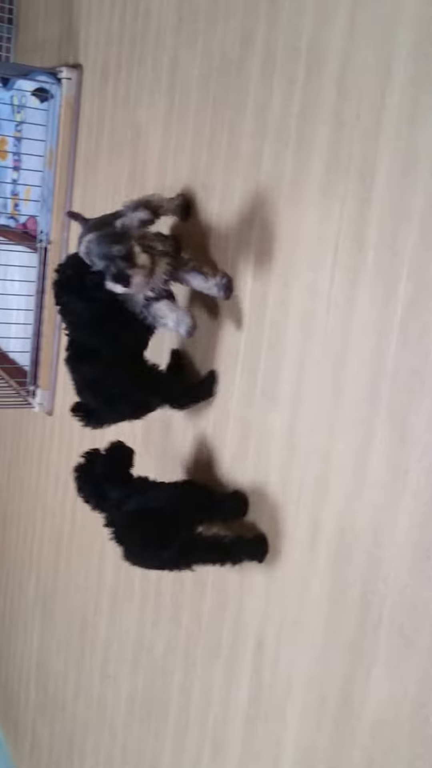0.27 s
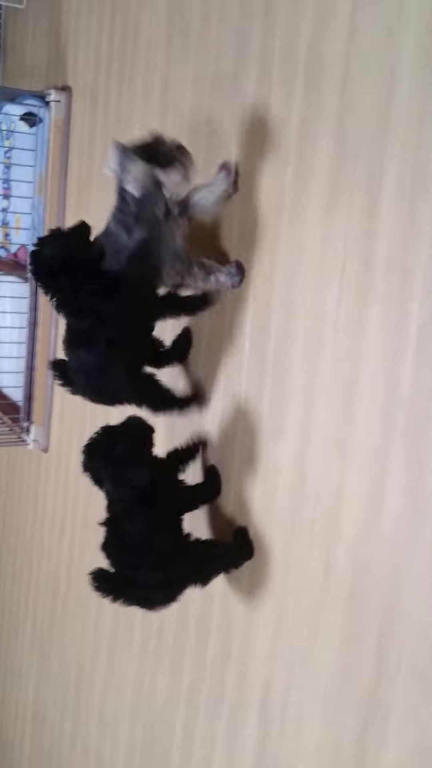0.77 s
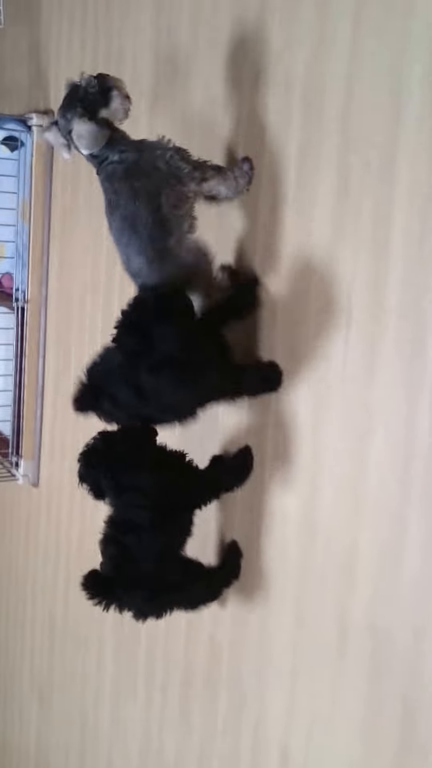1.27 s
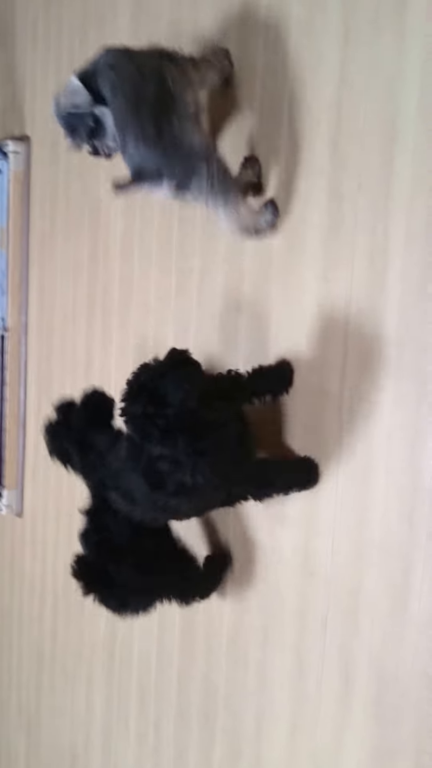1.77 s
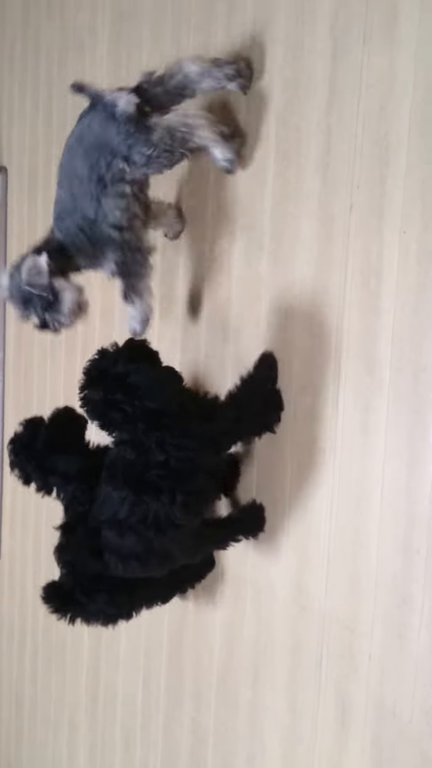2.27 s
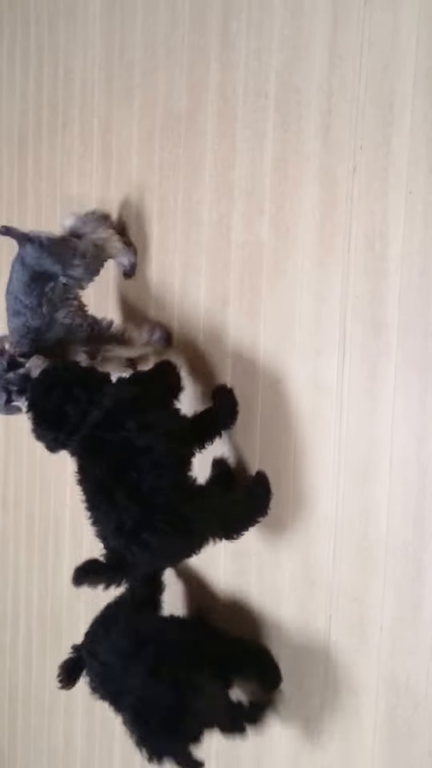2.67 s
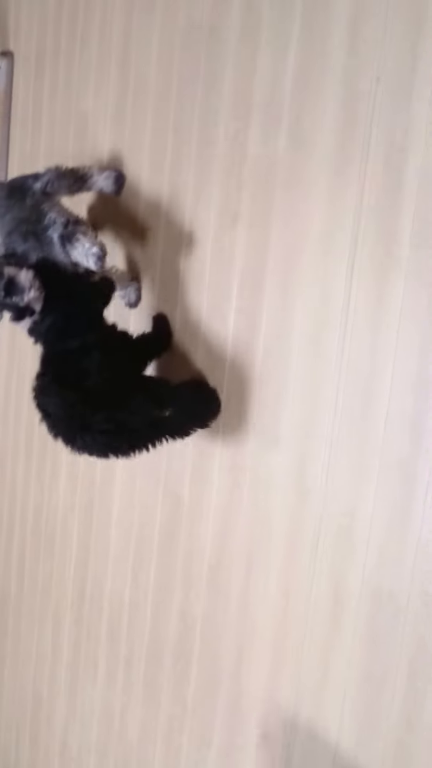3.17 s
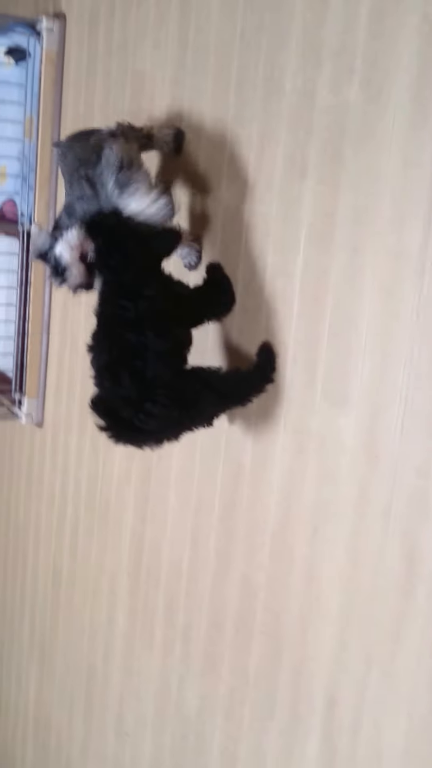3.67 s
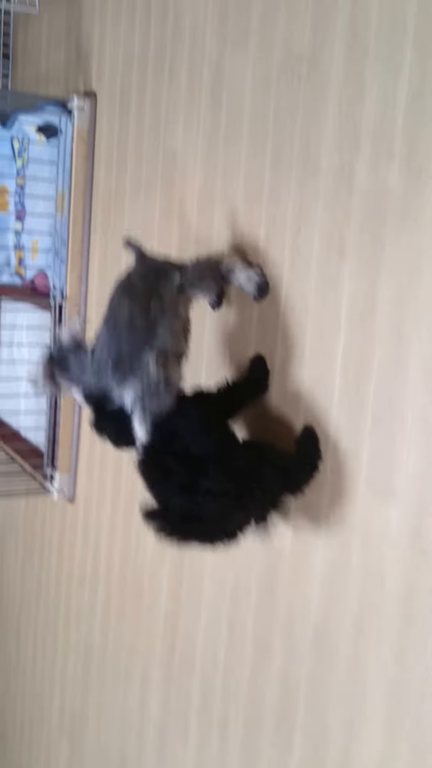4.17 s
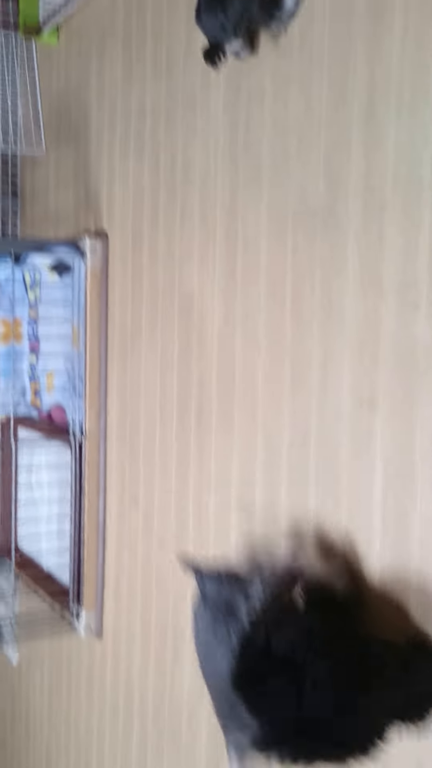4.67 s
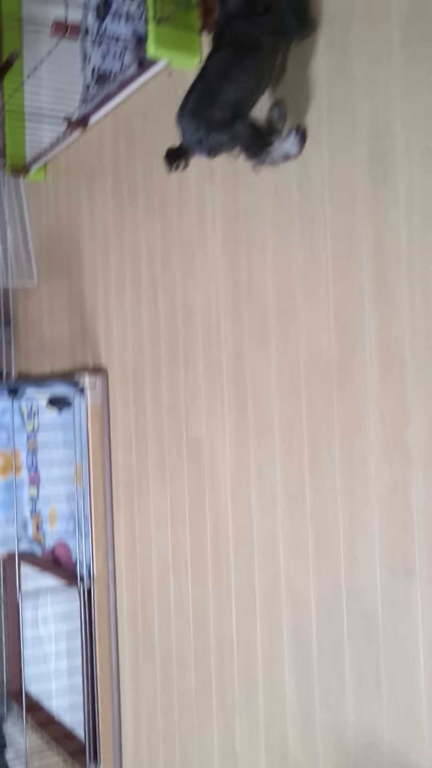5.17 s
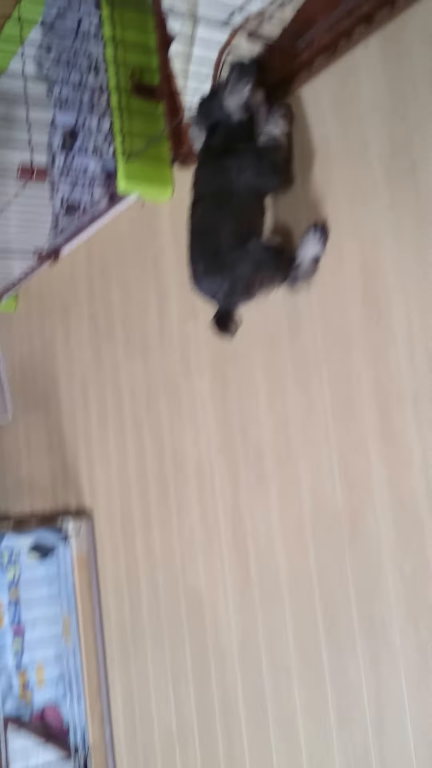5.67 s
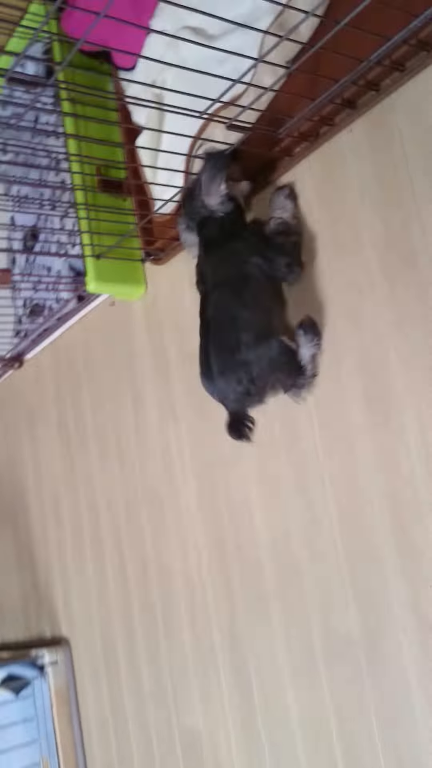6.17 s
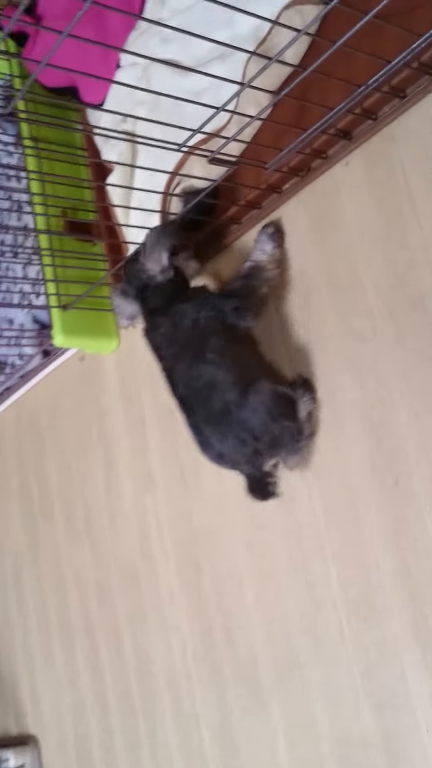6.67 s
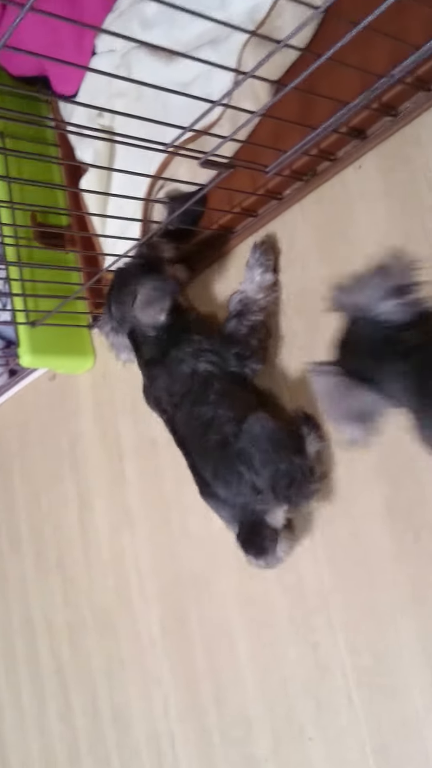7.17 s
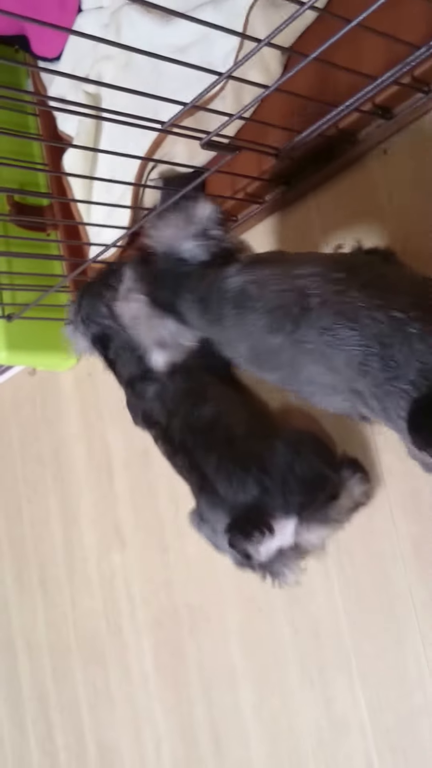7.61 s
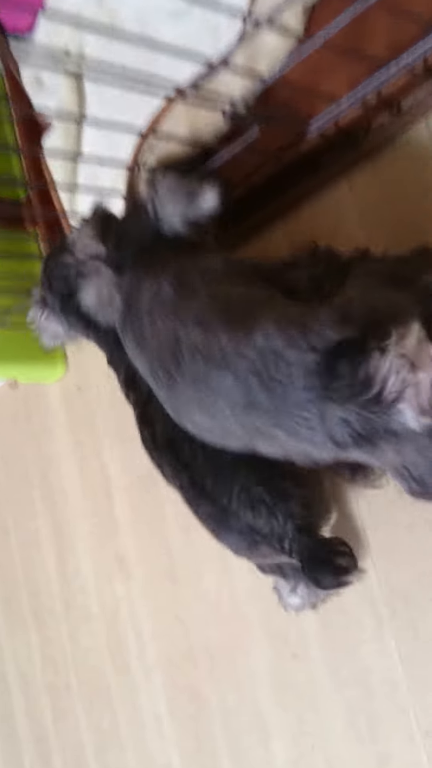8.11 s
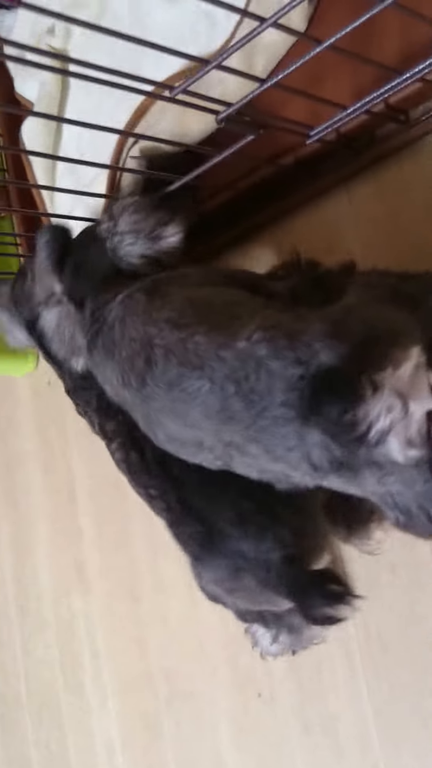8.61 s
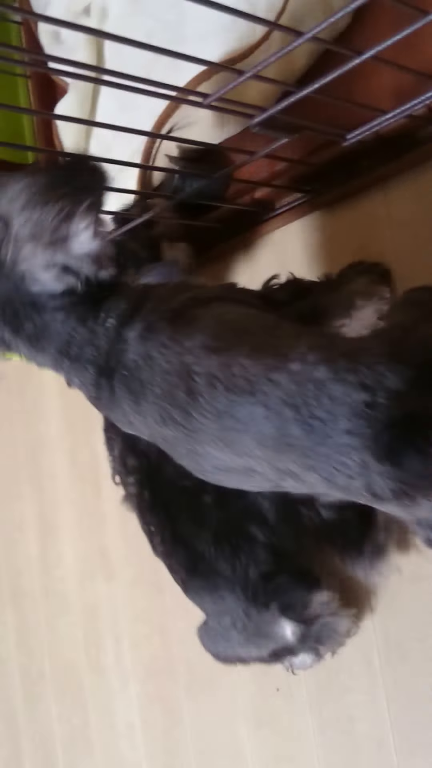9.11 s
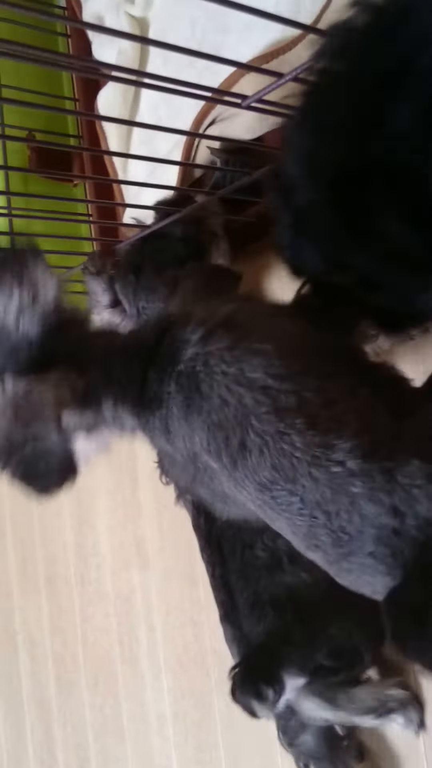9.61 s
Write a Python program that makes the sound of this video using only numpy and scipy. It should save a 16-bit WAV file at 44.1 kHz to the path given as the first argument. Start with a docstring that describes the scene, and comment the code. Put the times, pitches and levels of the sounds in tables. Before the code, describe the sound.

Irregular claw taps and scratchy paw scuffs of playing puppies on floorboards, with an early hollow thump, handling pops and faint cage rings later.

```python
"""A bare, lively room with a wooden floor: small puppies scamper near a hand-held phone.
Paws scrape as swarms of tiny damped slips; rumble and hiss are unsteady noise through resonances.
Claw taps are brief noise blows that ring board, claw and tip; landings boom and pads squeak.
A wire cage rings, a hollow thump hums, and fingers pop and click on the phone at the start.
The phone's two microphones differ in colour, in polarity and by a short path."""
import sys
import numpy as np
from scipy import signal
from scipy.fft import rfft, irfft, next_fast_len
from scipy.io import wavfile
from scipy.ndimage import map_coordinates

SR = 44100
rng = np.random.default_rng(int(sys.argv[2]) if len(sys.argv) > 2 else 0)


def to_linear_factor(level_db):
    """Convert decibel levels (scalar or array-like) to linear amplitude factors."""
    exponent = np.asarray(level_db, float) / 20
    return 10 ** exponent


def wav_out(sig):
    """Save sig, one row per channel (or a flat mono array), as 16-bit PCM at SR to the path in sys.argv[1]."""
    wavfile.write(sys.argv[1], SR, np.round(np.clip(np.atleast_2d(sig).T, -1, 1) * 32767).astype(np.int16))


N = 434385

# resonances of the floor boards: f/Hz, width/Hz, level/dB
FLOOR_BOARDS = [(461, 130, -7), (787, 346, 0), (984, 185, 3.5), (1493, 880, -5)]
# colour of claw tips and hissing pads: f/Hz, level/dB
TIP_COLOUR = [(2500, -17.5), (4800, -10), (7000, 0.5), (11000, 1), (16000, -6)]


def unit(x):
    """Scaled to rms 1."""
    return x / np.sqrt(np.mean(x ** 2) + 1e-20)


def along(points, hz):
    """Reads a curve of (f/Hz, value) points on a log frequency axis."""
    f, v = np.transpose(points)
    return np.interp(np.log(hz + 1), np.log(f + 1), v)


def envelope(points):
    """Gain over the whole scene from (t/s, level/dB) points, joined straight in dB."""
    return to_linear_factor(np.interp(np.arange(N) / SR, *np.transpose(points)))


def filtered(x, response):
    """Multiplies the spectrum of x by a complex response of frequency."""
    n = x.shape[-1]
    m = 2 * next_fast_len(n // 2 + 4096)  # room for the ringing to die away
    spectrum = rfft(x, m) * response(np.fft.rfftfreq(m, 1 / SR))
    return irfft(spectrum, m)[..., :n]


def highpass(x, corner_hz):
    """Steep bass cut without phase shift, 6 dB down at the corner."""
    return filtered(x, lambda hz: 1 / (1 + (corner_hz / (hz + 1)) ** 4))


def causal(points):
    """Minimum-phase response of (f/Hz, level/dB) points: the colour never sounds ahead of its cause."""
    def response(hz):
        cepstrum = irfft(np.log(to_linear_factor(along(points, hz))))
        cepstrum[1:len(hz) - 1] *= 2
        cepstrum[len(hz):] = 0
        return np.exp(rfft(cepstrum))
    return response


def modes(table):
    """Causal response of (f/Hz, width/Hz, level/dB) resonances, passed twice for steep skirts."""
    def response(hz):
        total = 0
        for k, (centre, width, db) in enumerate(table):
            damping = 1j * hz * width
            resonance = damping / (centre * centre - hz * hz + damping)
            total = total + (-1) ** k * to_linear_factor(db) * resonance  # neighbours alternate in sign
        return np.square(total)
    return response


def grains(pitch_hz, count, cycles, spread, uneven_db):
    """Tiny slips at chance moments: damped sines of scattered pitch and size, rms 1 in all."""
    when = rng.integers(0, N, count)
    scatter, size = rng.standard_normal(count), rng.exponential(size=count)
    k = np.arange(128)
    grain_hz = pitch_hz[when] * np.exp(spread * scatter)
    turns = grain_hz[:, None] * k / SR
    wave = to_linear_factor(uneven_db * size)[:, None] * np.sin(2 * np.pi * turns) * np.exp(-turns / cycles)
    places = when[:, None] + k
    return unit(np.bincount(places.ravel(), wave.ravel(), N + len(k))[:N])


def stutter(rate, depth_db):
    """Noise of rms 1 whose strength wavers at random, as a rubbing surface grips and lets go."""
    knots = rng.standard_normal(int(N * rate / SR) + 4)
    grip = map_coordinates(knots, [np.arange(N) * rate / SR])
    return unit(to_linear_factor(depth_db * grip) * rng.standard_normal(N))


def ringing(level, hz, width, rate, depth_db):
    """Uneven rubbing heard through one narrow resonance."""
    return level * unit(filtered(stutter(rate, depth_db), modes([(hz, width, 0)])))


def swells(peak_s, rise_db_s, fall_db_s, t):
    """Power of events that swell and fade straight in dB, one row each."""
    late = t - np.reshape(peak_s, (-1, 1))
    rise = late * np.reshape(rise_db_s, (-1, 1))
    fall = -late * np.reshape(fall_db_s, (-1, 1))
    return to_linear_factor(2 * np.minimum(rise, fall))


def pair(two):
    """Two unrelated signals made alike in the bass, as diffuse sound is at close microphones."""
    # diffuse sound: f/Hz, left-right likeness (0 to 1)
    likeness = [(100, 0.73), (700, 0.86), (2500, 0.065), (6000, 0.034), (15000, .05)]

    def mid_side(hz):
        angle = np.arccos(np.clip(along(likeness, hz), 0, 1)) / 2
        return np.array([np.cos(angle), np.sin(angle)])

    mid, side = filtered(two, mid_side)
    return np.array([mid + side, mid - side])


def effort(at):
    """Scrape pitch and gains of scrape, rumble and hiss at given times: scuffs over light shuffling."""
    # paw scuffs: t/s of the peak, swell/s, scrape f/Hz, then scrape, board rumble and pad hiss level/dB
    scuffs = [(0.056, 0.011, 2400, -44.5, -42, -29.5), (0.12, 0.036, 2320, -46, -55, -43.5),
              (0.306, 0.21, 2430.0, -62.5, -68, -51.5), (0.65, 0.12, 3420, -54.5, -56, -59),
              (0.74, 0.09, 2900.0, -66, -56, -43), (0.809, 0.15, 2900, -46.5, -64, -36),
              (0.989, 0.015, 3060.0, -35.5, -50, -30.5), (1.02, 0.026, 2000, -43, -59, -43),
              (1.05, 0.077, 2120, -44, -43.5, -43), (1.148, 0.12, 2770.0, -45, -43, -39.5),
              (1.378, 0.02, 2750.0, -43, -51, -34.0), (1.482, 0.063, 2750, -39.5, -36.5, -39.5),
              (1.56, 0.24, 2780.0, -59, -54, -40), (1.79, 0.076, 2920, -68, -67, -46),
              (1.921, 0.044, 2280, -52, -45, -60), (1.998, 0.016, 2340, -33, -32.5, -32.5),
              (2.15, 0.1, 2700, -39, -47.5, -38), (2.389, 0.076, 3170, -41.5, -45, -40.5),
              (2.64, 0.1, 2840, -53.5, -50.0, -61), (2.7, 0.044, 3700, -50, -74, -39.0),
              (2.8, 0.15, 3320, -47, -51.5, -44), (2.948, 0.091, 2740.0, -42, -49.5, -39.5),
              (3.06, 0.016, 2600, -39.5, -54, -41), (3.11, 0.073, 3430, -39.5, -52, -38.5),
              (3.38, 0.06, 3330, -58, -76, -50.5), (3.518, 0.063, 3110, -42, -42, -39),
              (3.862, 0.12, 2460, -45.5, -50, -44.0), (3.938, 0.1, 3200.0, -44, -40.5, -44),
              (4.05, 0.3, 3400, -53.5, -76, -49.5), (4.22, 0.093, 3100, -54.5, -72, -48),
              (4.4, 0.028, 2900, -54.5, -74, -49.5), (4.501, 0.073, 3520, -47.5, -70.5, -43),
              (4.73, 0.12, 3200, -48.5, -48.5, -43), (4.81, 0.062, 3440.0, -43.5, -46.5, -41.5),
              (5.02, 0.033, 2700, -50, -52.5, -46.5), (5.2, 0.15, 3120, -50, -57.5, -50),
              (5.33, 0.079, 2640.0, -72, -53, -69), (5.412, 0.096, 2700, -45.5, -60, -42),
              (5.6, 0.12, 2820, -55.5, -53, -57), (5.72, 0.1, 3570, -53.5, -54.5, -48),
              (5.822, 0.082, 2750, -37.5, -40.5, -33), (5.95, 0.16, 2600.0, -51.5, -69.5, -43.5),
              (6.0, 0.06, 2530, -51, -74, -48), (6.21, 0.13, 2720, -49.5, -65.0, -42.5),
              (6.41, 0.087, 3060, -55, -77, -55), (6.56, 0.11, 3320, -49.5, -94, -48.5),
              (6.65, 0.1, 3050, -51, -77, -47.5), (6.689, 0.06, 2090, -43.5, -67.0, -45),
              (6.74, 0.08, 2000, -52.5, -63, -47), (6.85, 0.13, 3490, -48, -69, -47.5),
              (6.91, 0.027, 3700, -56, -65, -50), (7.42, 0.093, 2840, -46.5, -77, -39.5),
              (7.56, 0.12, 2480, -52.5, -71, -49), (7.751, 0.017, 2750.0, -47, -48.5, -44),
              (7.858, 0.021, 2690, -47, -61.0, -44.5), (7.99, 0.036, 2460.0, -57, -51, -33),
              (8.07, 0.3, 2600, -52.5, -58.5, -47), (8.198, 0.08, 2400, -70, -60, -52),
              (8.501, 0.063, 2340, -46, -44.5, -38.5), (8.662, 0.045, 2380.0, -47, -44.5, -32.5),
              (8.78, 0.25, 2280, -51.5, -53, -48.0), (8.89, 0.056, 2980.0, -43, -43, -38),
              (8.97, 0.098, 3400.0, -59, -58.0, -60), (9.06, 0.19, 2500, -64, -59.5, -52),
              (9.2, 0.025, 2800, -66, -78, -45), (9.27, 0.08, 2900, -60, -60, -57),
              (9.411, 0.076, 2900, -49, -59.5, -38.5), (9.52, 0.059, 2600, -53, -66, -44.5),
              (9.67, 0.054, 3500, -67, -69, -69), (9.845, 0.018, 2700.0, -68, -67.5, -43)]
    # light shuffling between the scuffs: t/s, scrape level/dB
    shuffle = [(0, -63.5), (.5, -60), (.7, -57.5), (1.3, -63.5), (1.7, -56.5), (2.3, -60.5), (3.3, -64),
               (3.65, -68), (4.3, -67), (5.2, -59), (6.1, -56.5), (6.5, -66), (7.1, -63), (7.35, -72),
               (7.6, -61.5), (8.35, -62), (9.1, -61), (9.85, -59)]
    shuffle_hz = 2750
    over_scrape_db = np.array([[0], [-7.5], [2.5]])  # shuffled scrape, rumble, hiss
    swell_db = 20.5  # a scuff swells by this much, and falls as much in fade_s
    t = np.arange(0, N / SR + .002, .001)
    s, swell_s, hz, *db = np.transpose(scuffs)
    swell_s = np.maximum(swell_s, .003)
    fade_s = .047 + .45 * swell_s  # slow scuffs also fade slowly
    shape = swells(s, swell_db / swell_s, swell_db / fade_s, t)
    calm = to_linear_factor(2 * (np.interp(t, *np.transpose(shuffle)) + over_scrape_db))
    power = to_linear_factor(2 * np.array(db)) @ shape + calm
    # the stronger scrape draws the pitch to itself
    pitch = ((hz * to_linear_factor(2 * db[0])) @ shape + shuffle_hz * calm[0]) / power[0]
    return [np.interp(at, t, curve) for curve in [pitch, *np.sqrt(power)]]


def paws():
    """Sliding paws scrape with the claws, drum the boards and hiss with the pads."""
    hz, scrape_gain, boards_gain, hiss_gain = effort(np.arange(N) / SR)
    scrape = grains(hz, count=14000, cycles=3.2, spread=.14, uneven_db=2.8)
    scrape = highpass(scrape, 700)  # small claws push no bass
    boards = unit(filtered(stutter(90, depth_db=2.5), modes(FLOOR_BOARDS)))
    hiss = unit(filtered(stutter(150, depth_db=3), causal(TIP_COLOUR)))
    return scrape_gain * scrape + boards_gain * boards + hiss_gain * hiss


def patter(count):
    """Small taps at chance moments, as strong as the paws are busy."""
    over_paws_db = [8.5, 8, 22]  # knock over rumble, ring over scrape, tick over hiss
    spread_db, side_spread_db = 4.5, 4
    s, chance = rng.uniform(0, N / SR, count), rng.standard_normal((count, 4))
    _, scrape, boards, hiss = effort(s)
    db = 20 * np.log10([boards, scrape, hiss]).T + over_paws_db + spread_db * chance[:, :3]
    return np.column_stack([s, db, side_spread_db * chance[:, 3]])


def taps():
    """Each tap is a brief blow that rings board, claw and tip; it lands nearer one microphone."""
    # loud claw taps: t/s, board knock, claw ring and bright tick level/dB, lean to the left level/dB
    loud_taps = [(0.055, -43, -20, -26, 2), (0.6422, -60, -48, -24, 2), (0.6557, -50, -52, -19.5, 3.5),
                 (0.6981, -36.5, -49, -16, 3), (0.732, -63, -52, -19.5, 12), (0.755, -48, -47, -32, 2.0),
                 (0.7964, -33, -25, -10, -1.5), (0.8587, -53, -32.5, -24, -0.5),
                 (0.972, -34.5, -23, -11.5, -3.5), (0.983, -35.5, -42.0, -13, 1.5),
                 (1.0438, -20, -23.5, -26, -3.5), (1.1057, -22.5, -22.5, -30.5, -2),
                 (1.1396, -37, -24, -14, -0.5), (1.2558, -35.5, -34.5, -39.5, 0.5),
                 (1.346, -35, -50, -53, 4), (1.3575, -27, -29, -13.5, -4), (1.365, -38, -26.5, -36.5, 0.0),
                 (1.3781, -58, -40, -19, 2.5), (1.4639, -36, -26, -40, 2.5),
                 (1.5382, -34.0, -26.5, -14, -0.5), (1.6285, -38, -24.5, -16, -2.5),
                 (1.7572, -36, -32.5, -38, -3.5), (1.7782, -48, -36, -23, 4.5),
                 (1.9208, -42, -30, -25.5, -0.5), (1.9906, -20.5, -28, -28, -1),
                 (1.9952, -17, -10.5, -17, -3), (2.1269, -39, -33.0, -33, -6),
                 (2.1767, -33, -26, -22, -6.0), (2.3439, -23, -40, -41, -9), (2.3628, -42, -31, -17, 2.5),
                 (2.3823, -31, -36.0, -10, 0.5), (2.4202, -48, -32, -19, -6.5),
                 (2.6247, -29, -31.5, -28.5, -4.5), (2.6846, -60, -35.0, -19.5, -1.0),
                 (2.7245, -58, -31.5, -13.5, 2.5), (2.7784, -43, -35, -18.5, 3),
                 (2.8068, -48, -38.0, -27, 0.5), (2.8622, -29.5, -27.5, -27, -2),
                 (2.9146, -24.0, -22.5, -18, -2.5), (2.9515, -51, -41, -10, 1.5),
                 (3.0582, -39, -24.5, -23, -6.5), (3.098, -47, -36, -10.5, 0.0),
                 (3.1126, -43.0, -30, -14.0, 0), (3.2857, -48, -35.5, -27.5, -5.5),
                 (3.4783, -28, -27, -24, 2), (3.5077, -28, -26.5, -9, 0), (3.7267, -52, -38.5, -28.5, -0.5),
                 (3.8035, -46, -37, -24.5, -1), (3.9547, -51, -40, -18, 5), (4.028, -63.5, -33, -21.5, 1),
                 (4.1193, -41, -36, -27.5, 0), (4.3912, -53, -48, -39, 5),
                 (4.4985, -57, -31.0, -28.5, -7.5), (4.6431, -51, -56, -26, 6),
                 (4.706, -32, -35.0, -25, 5.5), (4.7868, -23.5, -25, -18.5, 2),
                 (4.8078, -39.0, -28, -15.5, 1), (5.0183, -55, -40, -32, 3),
                 (5.0991, -41, -35.0, -33.5, -4.5), (5.1784, -28, -24, -22, -3),
                 (5.3585, -34.5, -27.5, -34.5, -3), (5.3999, -47.5, -24, -38, -2.5),
                 (5.4249, -60, -51, -19, 1), (5.572, -34, -35, -25.5, -1.0), (5.7042, -48, -44, -23, 0),
                 (5.7875, -32, -35.0, -37, -2.0), (5.8095, -24, -27, -41, 5),
                 (5.9666, -54, -33.0, -19, -10.5), (6.0016, -59, -24.5, -31, -7.5),
                 (6.04, -59, -35, -29, 5), (6.1477, -62, -34, -30, 5.5), (6.1891, -68, -31, -19, 7.5),
                 (6.39, -55, -42, -40, -2), (6.5229, -62, -40, -41, -1), (6.6875, -49, -26.5, -41.5, 0),
                 (7.1799, -41, -40, -41, 1.5), (7.3914, -58.0, -42.0, -21, -2.5),
                 (7.5595, -56, -44, -23, -2.5), (7.6588, -43, -39, -27, -0.5), (7.7491, -42, -71, -37, -8),
                 (7.7596, -61, -31.5, -19, 3.5), (7.8414, -36, -24, -20, -2), (7.9551, -49, -50, -36, 2),
                 (7.9731, -48.5, -22, -9.5, -3), (8.1023, -49, -43, -22, -6),
                 (8.1826, -48, -33, -22, -10.5), (8.4435, -49, -38, -26.5, 4.5),
                 (8.4804, -24, -26, -20.5, 1.5), (8.5293, -55, -33, -12.5, 4),
                 (8.6271, -52, -34.0, -16, -2.5), (8.6401, -48, -24.5, -11.5, -2),
                 (8.685, -33, -23, -12, 2.5), (8.7718, -15, -18.0, -7.5, 1.5), (8.8446, -24, -34, -24, 0),
                 (8.8665, -25, -46, -11, 1), (8.8935, -41.0, -29, -10.5, 4), (8.9119, -46, -29, -9, 4),
                 (8.9623, -61.5, -35, -11, 3.5), (8.9878, -53, -48, -24.5, -9.5),
                 (9.1888, -72, -63, -32.0, 12.5), (9.2606, -49, -36.5, -45, -3.5),
                 (9.4023, -62, -43, -16, 5.5), (9.4173, -67, -49, -12, 2.5), (9.5121, -62, -54, -23, -6),
                 (9.6238, -70, -57, -29, -3.5), (9.7046, -49, -40.0, -28.5, 6), (9.8229, -59, -55, -34, 9),
                 (9.843, -62, -54, -21.5, 2.5)]
    # a claw on varnish: f/Hz, width/Hz, level/dB
    claw = [(1920, 180, -4), (2600, 780, -0.5), (3860, 2770, -6)]
    toes_s, toes_db, toes_spread_db = .012, -5, 5  # other claws land within toes_s, at toes_db or weaker
    out, t = np.zeros((2, N + SR)), np.arange(2048) / SR
    rows = np.concatenate([loud_taps, patter(count=100)])
    # axes: tap, claw of the paw, part (knock, ring, tick), time
    per_claw = (len(rows), 3, 1, 1)
    other_claws = np.array([[[0]], [[1]], [[1]]])  # the first claw is on time and at full strength
    late = t - toes_s * rng.uniform(size=per_claw) * other_claws
    gain = to_linear_factor((toes_db - toes_spread_db * rng.exponential(size=per_claw)) * other_claws)
    late = np.maximum(late, 0)
    shape = to_linear_factor(-60 * late / [[.003], [.004], [.008]])  # t60/s of the blow for knock, ring and tick
    shape = shape * (1 - np.exp(-late / .00018))  # the claw gives a little as it lands
    blows = rng.standard_normal((len(rows), 3, len(t))) * (gain * shape).sum(axis=1)
    bodies = [modes(FLOOR_BOARDS), modes(claw), causal(TIP_COLOUR)]
    rings = [filtered(blows[:, k], body) for k, body in enumerate(bodies)]
    rings = np.stack([ring / np.abs(ring).max(1, keepdims=True) for ring in rings], axis=1)
    for (s, *db, side_db), ring in zip(rows, rings):
        tap = to_linear_factor(db) @ ring
        lead_s = .00002 * side_db  # the nearer microphone hears it first
        left_start = max(round((s - lead_s) * SR), 0)
        right_start = max(round((s + lead_s) * SR), 0)
        out[0, left_start:][:len(t)] += to_linear_factor(.55 * side_db - 5) * tap
        out[1, right_start:][:len(t)] += to_linear_factor(-.4 * side_db - 10) * tap
    return out[:, :N]


def thuds():
    """A whole body lands and flexes the floor: one low, short boom."""
    # heavy landings: t/s, level/dB
    landings = [(1.996, -28), (8.49, -41), (8.771, -29.5), (8.869, -42)]
    hz, t60_s, attack_s = 370, .024, .0014
    out, t = np.zeros(N), np.arange(SR // 8) / SR
    boom = to_linear_factor(-60 * t / t60_s) * np.sin(2 * np.pi * hz * t) * (1 - np.exp(-t / attack_s))
    for s, db in landings:
        out[round(s * SR):][:len(t)] += to_linear_factor(db) * boom
    return out


def squeaks():
    """A pad squeaks on the varnish: narrow, pitched rubs."""
    # squeaks: t/s of the peak, level/dB
    pad_rubs = [(6.85, -51), (9.67, -62)]
    s, db = np.transpose(pad_rubs)
    power = to_linear_factor(2 * db) @ swells(s, 350, 350, np.arange(N) / SR)  # rise and fall in dB/s
    return ringing(np.sqrt(power), hz=3460, width=300, rate=60, depth_db=-2)


def cage():
    """Paws and noses nudge the wire cage, which rings in one narrow band."""
    # nudges: t/s of the peak, level/dB
    nudges = [(5.988, -46), (6.198, -46), (7.43, -51), (7.546, -49), (7.976, -40), (8.19, -51.5),
              (8.656, -40.5)]
    s, db = np.transpose(nudges)
    power = to_linear_factor(2 * db) @ swells(s, 450, 185, np.arange(N) / SR)  # rise and fall in dB/s
    return ringing(np.sqrt(power), hz=2430, width=320, rate=80, depth_db=4)


def hollow_thump():
    """A hollow thump and its dying hum: uneven noise through one low resonance."""
    # thump and hum: t/s, level/dB
    hum = [(0.0, -45), (0.051, -53), (0.054, -29.5), (0.09, -27), (0.14, -47.5), (0.238, -50),
           (0.264, -53.5), (0.42, -61), (0.5, -100)]
    return ringing(envelope(hum), hz=706, width=320, rate=37.8, depth_db=3.5)


def fingers():
    """Dull short pops carried through the phone's body, dry clicks of the casing and a low rub."""
    # pops: t/s, level/dB, f/Hz
    pops = [(0.168, -31, 380), (0.441, -37, 370), (0.451, -37, 670), (0.465, -33, 376), (0.491, -31, 520),
            (0.511, -26, 360), (0.530, -25, 420), (0.559, -41, 595), (0.567, -38, 870)]
    # clicks of the casing: t/s, level/dB
    casing_clicks = [(0.411, -40), (0.452, -38), (0.495, -17.5), (0.527, -24), (0.538, -33)]
    # skin dragging between the pops: t/s, level/dB
    skin_rub = [(.42, -81), (.44, -51.5), (.5, -51), (.54, -47), (.58, -62), (.6, -90)]
    out, t = np.zeros(N), np.arange(SR // 20) / SR
    click = to_linear_factor(-60 * t / .0025) * np.sin(2 * np.pi * 1900 * t) * (1 - np.exp(-t / .00028))
    for s, db, hz in pops:
        pop = to_linear_factor(db - 60 * t / .014) * np.sin(2 * np.pi * hz * t) * (1 - np.exp(-t / .00021))
        out[round(s * SR):][:len(t)] += pop
    for s, db in casing_clicks:
        out[round(s * SR):][:len(t)] += to_linear_factor(db) * click
    out += ringing(envelope(skin_rub), hz=480, width=410, rate=120, depth_db=4.5)
    return out * to_linear_factor([[-6], [3]])  # stronger at the right microphone


def echoes(x, decay, seconds, count):
    """Diffuse echo; the puppies move, so every short stretch gets a decaying noise tail of its own."""
    out, hop = np.zeros((2, N + SR)), N // count + 1
    for start in range(0, N, hop):
        noise = rng.standard_normal((2, round(seconds * SR)))
        hz, t, z = signal.stft(noise, SR, nperseg=128)
        fading = z * to_linear_factor(-60 * t / along(decay, hz)[:, None])
        tail = signal.istft(fading, SR, nperseg=128)[1]
        tail = tail / np.linalg.norm(tail[0])
        wet = signal.fftconvolve(x[None, start:start + hop], tail, axes=1)
        out[:, start:start + wet.shape[1]] += wet
    return pair(out[:, :N])


def near_echo(x):
    """Short reflections from floor, cage and hand close by."""
    # nearby reflections: f/Hz, t60/s
    decay = [(500, 0.04), (8000, 0.042)]
    return echoes(x, decay, seconds=.04, count=360)


def room_echo(x):
    """The bare room answers a moment later, with a longer tail."""
    # room: f/Hz, t60/s
    decay = [(300, 0.3), (1000, 0.27), (3000, 0.34), (7000, 0.29), (15000, 0.16)]
    far = echoes(x, decay, seconds=.5, count=70)
    return np.pad(far, ((0, 0), (round(.006 * SR), 0)))[:, :N]


def room_tone():
    """The quiet air of the room: steady coloured noise."""
    # room tone: f/Hz, level/dB
    colour = [(25, -22), (50, -9), (70, 0), (200, -3), (500, -1.5), (1000, -4.5), (2500, -13), (6000, -19),
              (15000, -33)]
    noise = rng.standard_normal((2, N))
    return to_linear_factor(-61.5) * unit(pair(filtered(noise, lambda hz: to_linear_factor(along(colour, hz)))))


def hand_rumble():
    """The holding hand rumbles: noise through one broad bass resonance, rising and falling."""
    # rumble: t/s, level/dB
    rumble_level = [(0.0, -81), (0.13, -57), (0.27, -69), (0.55, -52), (0.66, -62.5), (1.29, -78),
                    (3.15, -69.5), (5.07, -83), (5.21, -63), (5.3, -81), (5.62, -63), (6.45, -66),
                    (7.05, -60.5), (7.16, -68.5), (9.85, -67.5)]
    noise = rng.standard_normal((2, N))
    return envelope(rumble_level) * unit(pair(filtered(noise, modes([(73, 220, 0)]))))


def scene():
    """Direct sound, nearby reflections, room echo and background at the two microphones."""
    slide = paws() + thuds() + squeaks() + cage() + hollow_thump()
    tap = taps()
    tap_mono = tap.mean(0)
    near = near_echo(to_linear_factor(-1.5) * slide + to_linear_factor(1.5) * tap_mono)
    far = room_echo(to_linear_factor(-6) * slide + to_linear_factor(-2) * tap_mono)
    background = room_tone() + hand_rumble()
    return to_linear_factor(-7.5) * slide + tap + near + far + background + fingers()


def low_pass(x):
    """Removes everything above the highest recorded frequency."""
    return signal.sosfilt(signal.butter(12, 16100, fs=SR, output="sos"), x)


def record(dry):
    """Each microphone has its colour; the right one is wired in opposite polarity and hears later."""
    # gain on the top treble of both microphones: t/s, level/dB
    top_treble_level = [(.66, -9.5), (2.7, -1), (3.2, -2), (5.2, -1.5), (5.8, 4.5), (7.6, -5.5), (9.2, -14)]
    # a finger over the right microphone dulls its treble, then lifts: t/s, level/dB
    covered = [(.6, -19), (.65, -0.5)]
    # colour of the left microphone: f/Hz, level/dB
    left_colour = [(30, -5.5), (70, -1.5), (800, -1), (1200, -3), (2400, 1.5), (3500, -6), (4700, 1.5),
                   (6400, 9.5), (7800, 0), (8300, -1.5), (9500, -1), (10500, -8), (12000, -20.5),
                   (15500, -10.5)]
    # colour of the right microphone: f/Hz, level/dB
    right_colour = [(30, -11.5), (70, -1.5), (800, 1.5), (1200, 4), (2400, 6.5), (3000, 3.5), (3800, 12),
                    (5000, 10.5), (7500, -4.5), (10000, -10), (12500, -6), (15500, -8)]
    path_s = .000366  # the right microphone hears later by this
    dry = dry + (envelope(top_treble_level) - 1) * highpass(dry, 9500)
    right_dry = dry[1] + (envelope(covered) - 1) * highpass(dry[1], 3100)

    def late_colour(hz):
        return causal(right_colour)(hz) * np.exp(-2j * np.pi * hz * path_s)

    left = filtered(dry[0], causal(left_colour))
    right = -filtered(right_dry, late_colour)
    return low_pass(np.array([left, right]))


dry = scene()
out = record(dry)
wav_out(out)
```